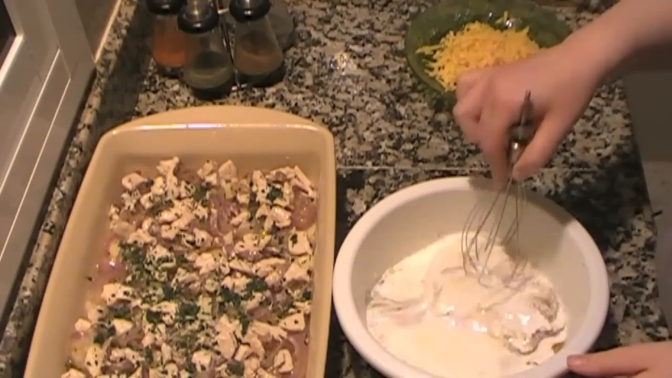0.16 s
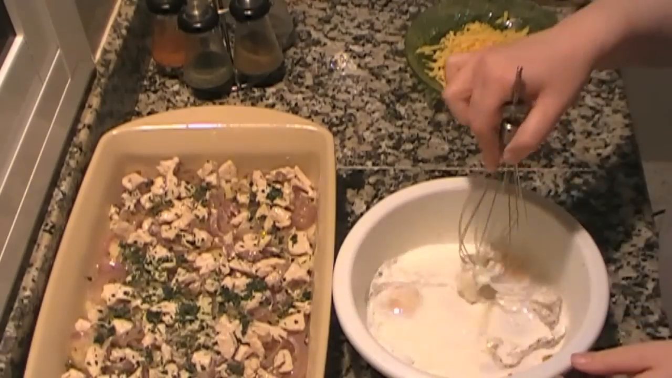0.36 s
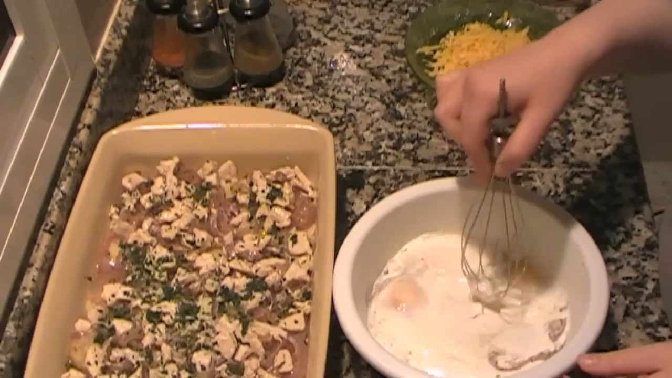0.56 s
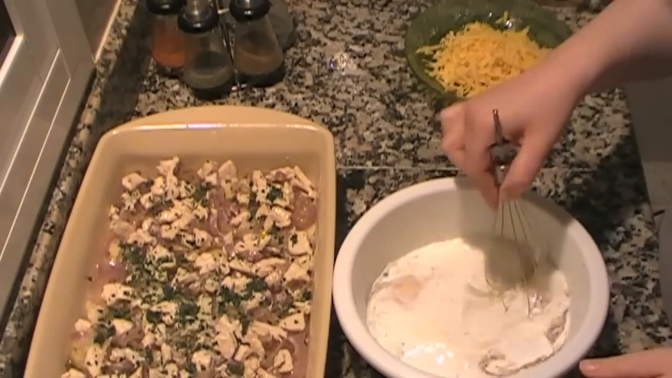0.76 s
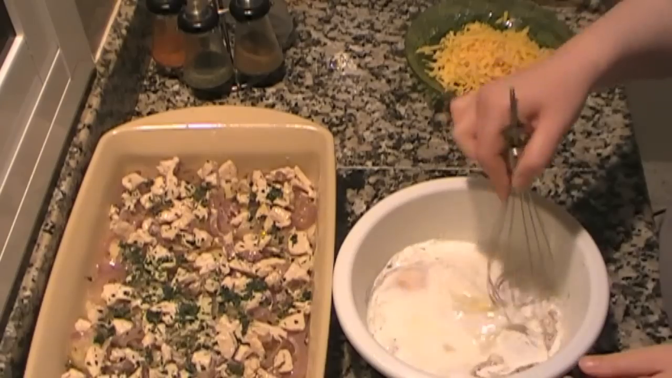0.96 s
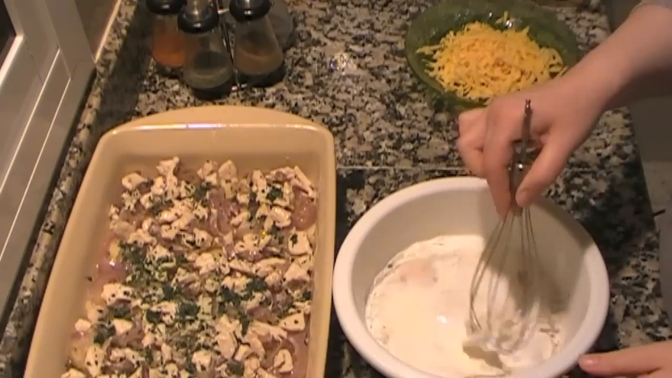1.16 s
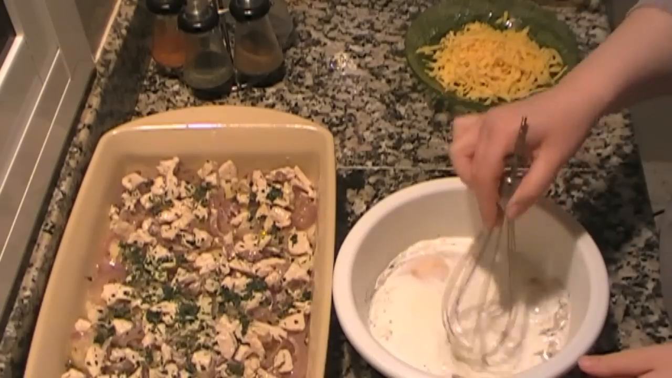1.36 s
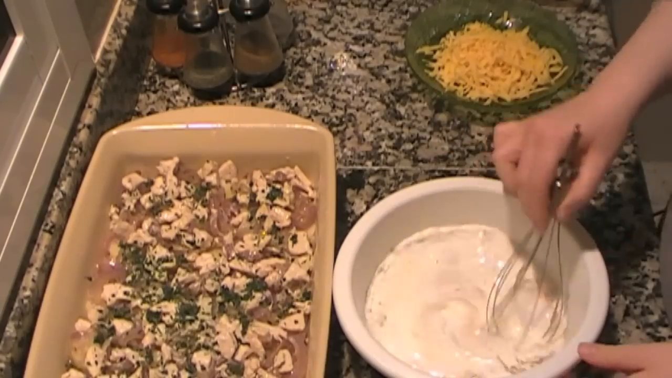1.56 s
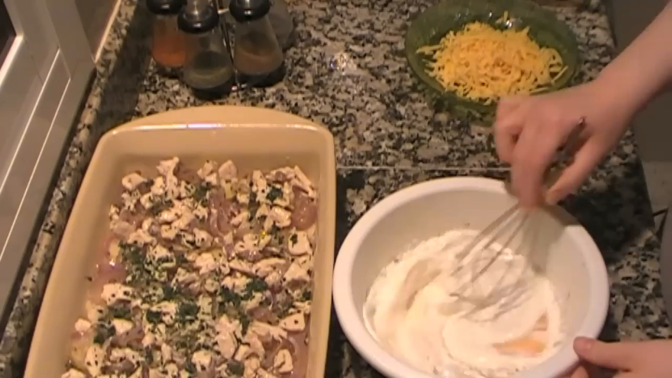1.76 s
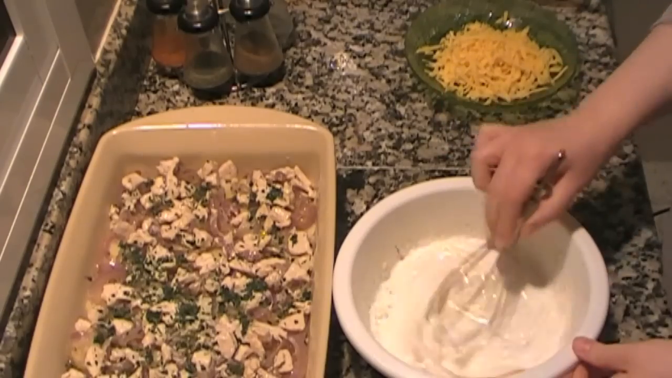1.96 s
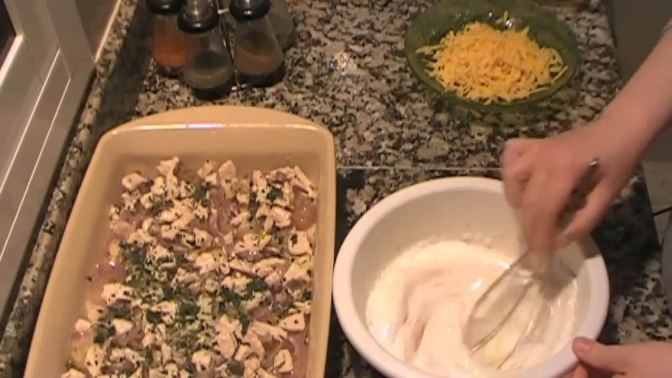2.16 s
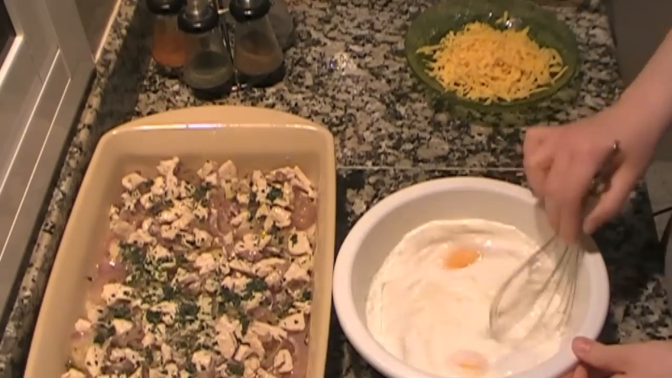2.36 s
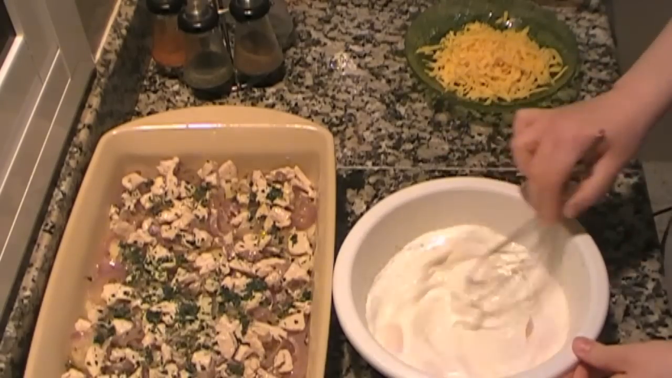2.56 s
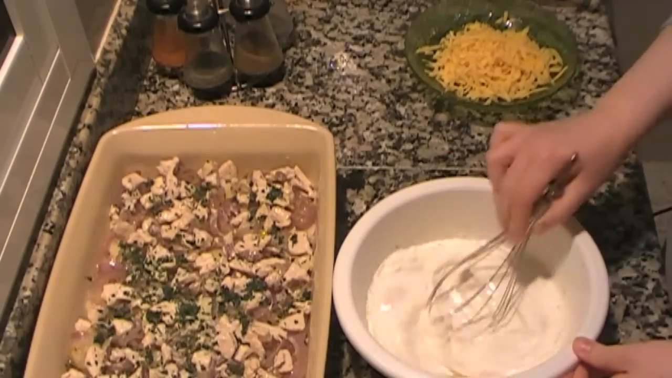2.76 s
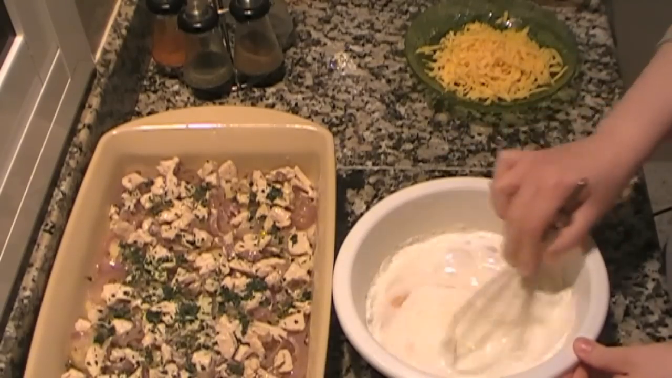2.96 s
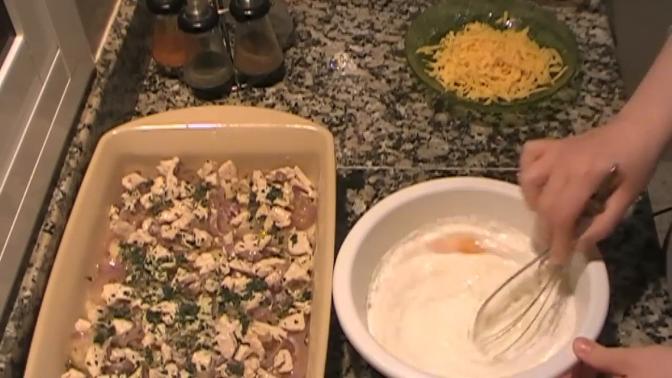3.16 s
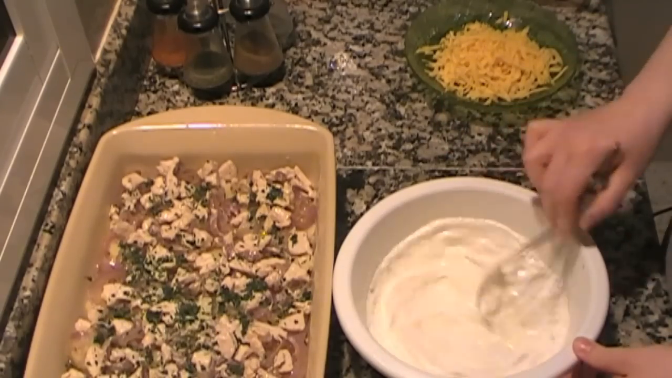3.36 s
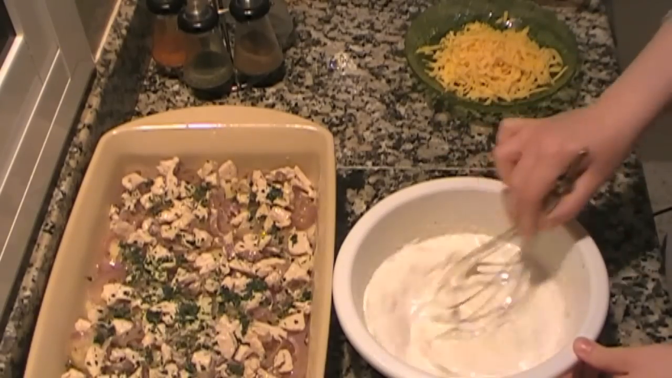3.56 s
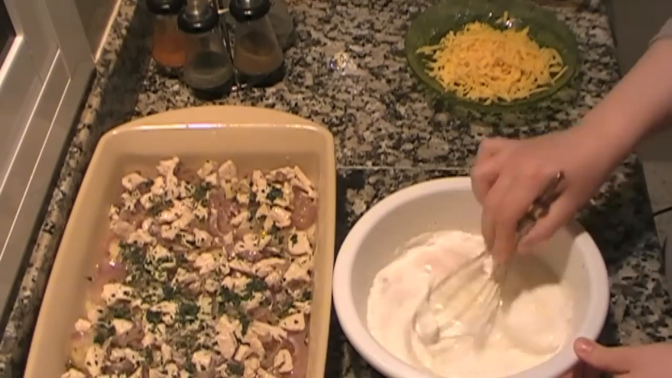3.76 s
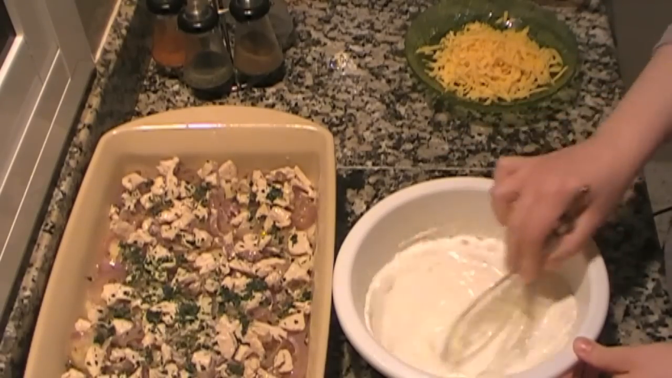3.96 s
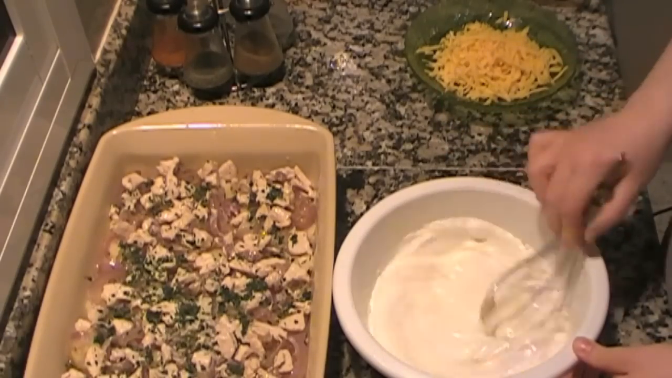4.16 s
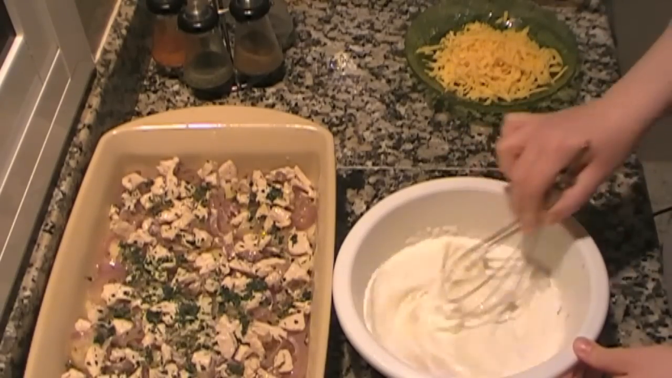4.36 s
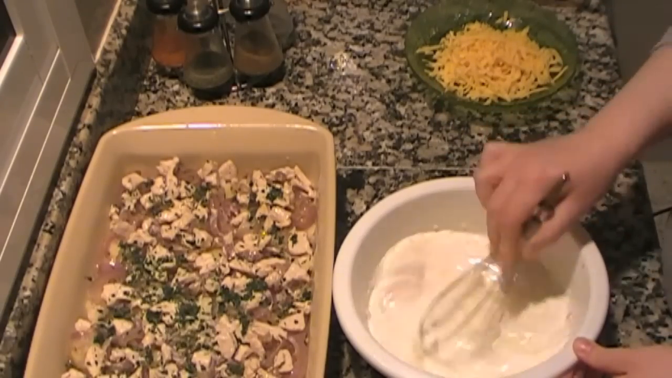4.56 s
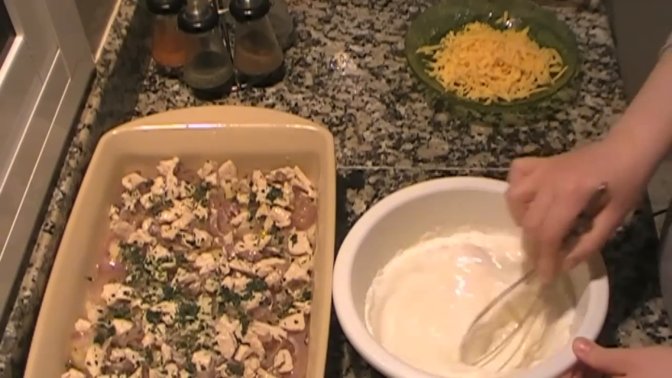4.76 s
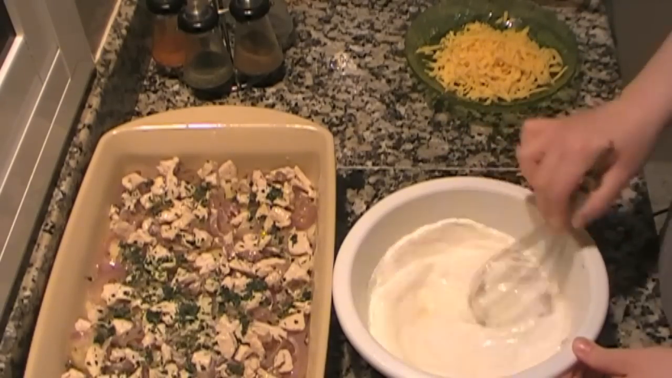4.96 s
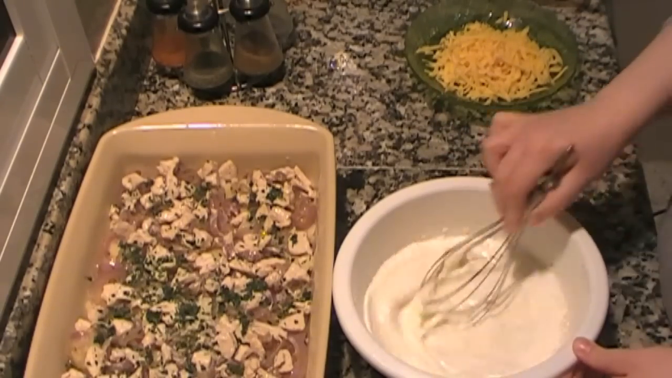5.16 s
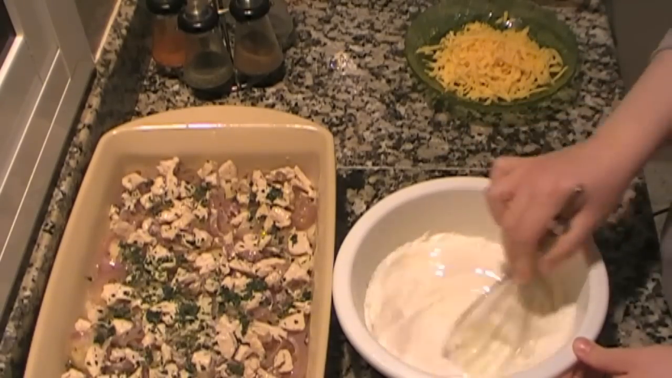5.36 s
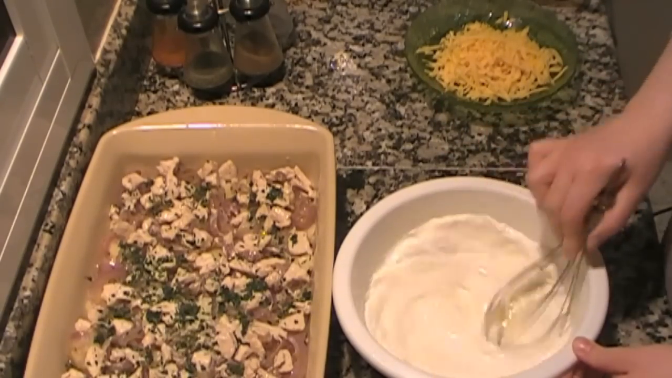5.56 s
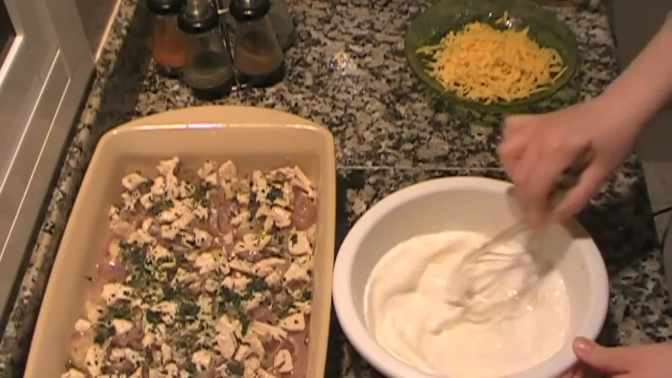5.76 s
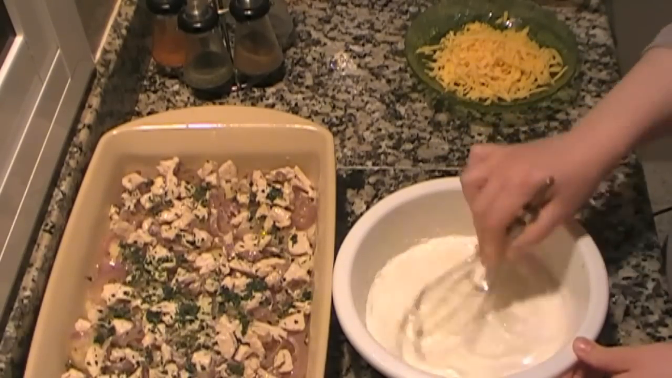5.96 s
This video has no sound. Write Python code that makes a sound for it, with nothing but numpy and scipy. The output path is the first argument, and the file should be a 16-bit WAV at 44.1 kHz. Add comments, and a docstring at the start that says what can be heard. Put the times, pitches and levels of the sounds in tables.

```python
"""Whisking eggs in a plastic bowl.

A wire whisk stabs six times at the bottom of a bowl of eggs and milk, then stirs fast circles.
Random touches ring bowl modes and wire pitches; decaying sines click; bubble blips make the slosh.
A dense decaying tail is the hard kitchen; shaped noise and a low hum, a sine near 99 Hz, lie under it.
Two microphone ports differ by frequency and cut the top treble."""
import sys
import numpy as np
from scipy import signal
from scipy.fft import rfft, irfft
from scipy.io import wavfile
from scipy.ndimage import uniform_filter1d

SR = 44100
rng = np.random.default_rng(int(sys.argv[2]) if len(sys.argv) > 2 else 0)


def to_wav(sig):
    """Store sig (one row per channel, or 1-D mono) as 16-bit WAV at the path in sys.argv[1].

    Samples outside -1..1 are clipped; the rate is SR.
    """
    pcm = np.clip(np.atleast_2d(sig), -1, 1) * 32767
    pcm = np.round(pcm).astype(np.int16)
    wavfile.write(sys.argv[1], SR, pcm.T)  # frames by channels


N = 265041
LEAD_IN = SR // 4  # samples computed before time zero

# Bowl modes. Each row: pitch [Hz], width before damping [Hz], relative drive [dB].
BOWL = [(278, 14, 4.5), (536, 30, -15), (565.5, 34, 3.5), (706, 21, -7), (760, 32, 6.5), (1176, 9.1, -5),
        (1310, 16, 3), (1371.5, 45, -2), (1432, 41, -7.5), (1816, 34, -13), (1983, 270, -4.5),
        (2134, 130, 0), (2518, 180, 0.5), (2726, 130, -8.5), (3310, 55, -2.5), (3790, 46, -4.5),
        (4500, 47, -9)]
# Whisk entry: first drag, a lift, then full contact. Each row: time [s], pressure level [dB].
ENTRY = [(1.51, -24), (1.57, -11.5), (1.63, -9.5), (1.68, -0.5), (1.72, -1.5), (1.75, -17), (1.79, -12.5),
         (1.85, -0.5)]
# Whisk circles. Each row: time of nearest sweep [s], scrape level [dB], wire fizz level [dB], before swells.
ROUNDS = [(1.69, -32, -35.5), (1.96, -34, -37), (2.24, -35, -39), (2.49, -36, -36), (2.75, -34, -36),
          (3.02, -35, -37), (3.31, -34, -37.5), (3.57, -34, -38), (3.8, -36, -36.5), (4.08, -34, -37),
          (4.36, -34.5, -35.5), (4.62, -36.5, -40), (4.87, -34, -36.5), (5.17, -33.5, -37),
          (5.44, -35.5, -36.5), (5.72, -36, -37), (5.98, -34, -37)]


def gain_of(db):
    """Decibels to a factor."""
    return 10 ** (np.asarray(db) / 20)


def evened(x):
    """Scaled to rms 1."""
    return x / np.sqrt(np.mean(x ** 2) + 1e-20)


def read(points, hz):
    """A spectrum table read on a log-frequency axis."""
    f, value = np.transpose(points)
    return np.interp(np.log(hz + 1), np.log(f + 1), value)


def add(mix, s, sound):
    """Mixes a sound in at a time; the mix starts LEAD_IN before zero."""
    part = mix[round(s * SR) + LEAD_IN:][:len(sound)]
    part += sound[:len(part)]


def coloured(x, points):
    """Passes x through a spectrum in dB."""
    hz = np.fft.rfftfreq(x.shape[-1], 1 / SR)
    return irfft(rfft(x) * gain_of(read(points, hz)), x.shape[-1])


def contacts(per_s, spread_db, size):
    """Sparse touches of random sign; a few are much stronger."""
    strength = gain_of(spread_db * np.minimum(rng.exponential(1, size), 4))
    return strength * rng.choice([-1, 1], size) * (rng.random(size) < per_s / SR)


def bump(t, s, length):
    """A soft rise and fall."""
    return np.exp(-((t - s) / length) ** 2)


def bowl(weight_db, damping=1):
    """The ring of the bowl after one touch: a sum of dying modes."""
    hz, width, db = np.transpose(BOWL)[:, :, None]
    t = np.arange(2048) / SR
    decay = np.exp(-np.pi * damping * width * t)
    return (gain_of(db + weight_db) * width * decay * np.sin(2 * np.pi * hz * t)).sum(0)


def knock(s, db, hz, second_hz, second_db, low_db):
    """Several wires land within milliseconds; the spot rings at two pitches of its own over the bowl's modes."""
    # Wires shivering after a knock. Each row: frequency [Hz], relative density [dB per Hz].
    splash_spectrum = [(2500, -2.5), (4000, 2.5), (7500, 4.5), (10000, -5.5), (12500, -11.5), (15500, -66)]
    # Wire loops ringing on. Each row: pitch [Hz], width [Hz].
    wire_modes = [(4050, 82), (4980, 210), (5220, 21), (6740, 43), (7200, 8.2)]
    stirred = s > ENTRY[-1][0]
    # stirred-up liquid shortens the ring, and only a few wires touch at once
    froth_damping = 1.7 if stirred else 1
    landing_s = 0.0016 if stirred else 0.0044
    chatter_base_db, chatter_follows = -22.5, 0.65  # dB, dB per dB of knock
    stays_down_s, stirred_chatter_db = 1.45, -4  # wires held in the liquid chatter less
    wire_share = 0.6

    t = np.arange(SR // 4) / SR
    short_t = t[:2048]
    touches = contacts(5000, 1.57, len(t))
    touches[50] = 4.2  # the first wire down

    modes_hz = np.array(BOWL)[:, :1]
    high = modes_hz > 900
    octaves_off = abs(np.log2(modes_hz / np.sqrt(hz * second_hz)))
    near = evened(bowl(np.where(high, -4.0 * octaves_off, -80), damping=4.8))
    spot_width_hz = np.array([[95], [150]]) * froth_damping
    spot_hz = np.array([[hz], [second_hz]])
    spot = np.exp(-np.pi * spot_width_hz * short_t) * np.sin(2 * np.pi * spot_hz * short_t)
    share = np.clip(gain_of(second_db), .05, .95)
    lower_share = np.sqrt(1 - share ** 2)
    ring = evened(lower_share * spot[0] + share * spot[1])

    # a light wire hardly stirs the bass at first
    thin = signal.butter(3, 1000, "high", fs=SR, output="sos")
    # the bulk of the wires arrives a moment after the first
    early_t = t[:900]
    arrival = np.exp(-(early_t / landing_s) ** 2) * np.clip(early_t / (0.28 * landing_s), 0, 1) ** 2
    arrivals = touches[:900] * arrival
    lower, upper, rest = (evened(np.convolve(arrivals, v)) for v in (*spot, near))
    first = signal.sosfilt(thin, lower_share * lower + share * upper + 0.077 * rest)

    splash = evened(coloured(touches, splash_spectrum))
    rattle = signal.oaconvolve(touches, near + 0.1 * ring)[:len(t)]
    rattle = evened(signal.sosfilt(thin, rattle))
    wire_hz, wire_width = np.transpose(wire_modes)[:, :, None]
    struck = gain_of(-30 * abs(np.log2(wire_hz / second_hz)))  # loops near the higher pitch ring most
    loops = struck * np.exp(-np.pi * wire_width * short_t) * np.sin(2 * np.pi * wire_hz * short_t)
    wires = struck.max() * evened(signal.oaconvolve(touches, loops.sum(0))[:len(t)])

    # relative to the knock, whose own level is applied at the end
    chatter_db = chatter_base_db + (chatter_follows - 1) * db + stirred_chatter_db * (s > stays_down_s)
    chatter = rattle + 0.67 * splash + wire_share * wires
    chatter *= gain_of(chatter_db - 60 * t / 0.36) * (1 - np.exp(-t / 0.0016))
    chatter[:len(first)] += first / abs(first).max()
    chatter[:900] += 1.6 * gain_of(chatter_db) * splash[:900] * arrival / arrival.max()

    # the low modes follow as the liquid is pushed aside
    shove = touches * (1 - np.exp(-t / 0.002)) * gain_of(-60 * t / 0.22)
    low = signal.oaconvolve(shove, bowl(np.where(high, -80, 0), damping=2.17))[:len(t)]
    return s, gain_of(db) * (chatter + gain_of(low_db) * low / abs(low).max())


def counter(x):
    """Echoes off things nearby reach the two ports in opposite polarity, mostly in the treble."""
    # Each row: frequency [Hz], echo level [dB].
    echo_spectrum = [(200, -27), (4800, -50), (6500, -17), (8500, -0.5), (13000, -13)]
    echoes = rng.standard_normal(1500) * gain_of(-60 * np.arange(1500) / SR / 0.017)
    side = signal.oaconvolve(x, echoes / np.linalg.norm(echoes))[:len(x)]
    side = coloured(side, echo_spectrum)
    return np.array([side, -side])


def diffuse(frames):
    """Random short-time spectra for two ports that are partly alike."""
    # Each row: frequency [Hz], left-right likeness [0 to 1].
    likeness = [(40, 0.26), (150, 0.92), (400, 0.97), (1500, 0.82), (5000, 0.8), (8000, 0.42),
                (15000, 0.19)]
    a, b, c, d = rng.standard_normal((frames, 257, 4)).T
    hz = np.fft.rfftfreq(512, 1 / SR)
    same = read(likeness, hz)[:, None]
    left, other = a + 1j * b, c + 1j * d
    return hz, np.array([left, same * left + np.sqrt(1 - same ** 2) * other])


def kitchen(x):
    """Hard walls and counters: a dense tail in which each band dies at its own speed."""
    # Each row: frequency [Hz], time to fall 60 dB [s].
    t60_s = [(200, 0.31), (600, 0.5), (1500, 0.58), (4000, 0.41), (9000, 0.36), (14000, 0.17)]
    # Room against direct sound. Each row: frequency [Hz], level [dB].
    echo_spectrum = [(200, -2.5), (1000, -8.5), (3000, -8.5), (7000, -8), (12000, -4.5)]
    hz, z = diffuse(300)
    t = np.arange(300) * 128 / SR
    decay = gain_of(-60 * t / read(t60_s, hz)[:, None])
    tail = signal.istft(z * decay, nperseg=512, noverlap=384)[1]
    tail *= np.clip((np.arange(tail.shape[1]) / SR - .003) / 0.00065, 0, 1)  # silent for the first 3 ms
    tail = coloured(tail / np.linalg.norm(tail[0]), echo_spectrum)
    return signal.oaconvolve(x[None], tail, axes=1)[:, :len(x)]


def background():
    """Steady room noise from shaped random spectra, and a low hum: a sine near 99 Hz."""
    # Each row: frequency [Hz], relative density [dB per Hz].
    air_spectrum = [(15, -59), (25, -29), (75, -16), (126, -24), (267, -2.5), (848, 4), (1570, -10),
                    (7700, -7.5), (10400, -18.5), (13500, -40), (15500, -57)]
    # Pitch [Hz], middle level [dB].
    hum_tone = (99.3, -74.5)
    air_db, waver_db = -50, 3.6  # the hum's level rises and dips irregularly
    hz, z = diffuse(N // 128 + 5)
    shaped = z * gain_of(read(air_spectrum, hz))[:, None]
    air = evened(signal.istft(shaped, nperseg=512, noverlap=384)[1][:, :N])
    waver = evened(uniform_filter1d(uniform_filter1d(rng.standard_normal(N), 5000), 5000))
    hum_hz, hum_db = hum_tone
    hum = np.sqrt(2) * np.sin(2 * np.pi * hum_hz * np.arange(N) / SR)
    return gain_of(air_db) * air + gain_of(hum_db + waver_db * waver) * hum


def click(s, db, hz):
    """A thin snap of a few cycles, answered by the walls of the bowl about a millisecond later."""
    t = np.arange(600) / SR - .0014
    pitches = hz * np.array([[1], [.78], [1.3], [1.95]]) * rng.uniform(0.96, 1.04, (4, 1))
    decay = np.exp(-(t / 0.00023) ** 2 * (t < 0) - t * (t > 0) / 0.00036)
    snap = (gain_of([[0], [-8], [-9], [-9]]) * decay * np.sin(2 * np.pi * pitches * t)).sum(0)
    # three delayed, weaker copies of the snap
    lags = (np.array([.0006, .0013, .0024]) * rng.uniform(0.78, 0.89, 3) * SR).astype(int)
    echoes = 0.19 * np.roll(snap, lags[0]) + 0.53 * np.roll(snap, lags[1]) + 0.2 * np.roll(snap, lags[2])
    snap = snap + echoes
    return s, gain_of(db) * snap / abs(snap).max()


def slow(count, size):
    """Independent wanderings of rms 1 that turn every few hundredths of a second."""
    return evened(uniform_filter1d(uniform_filter1d(rng.standard_normal((count, size)), 600), 400))


def dragged(size, surge_db, flutter_db, damping, low_hz, high_hz):
    """Dense touches ring one group of modes; as the wires travel each mode flares and fades on its own."""
    touches, out = contacts(5000, 2.36, size) * gain_of(surge_db), np.zeros(size)
    group = [mode for mode in BOWL if low_hz < mode[0] < high_hz]
    for (hz, width, db), flare in zip(group, slow(len(group), size)):
        r = np.exp(-np.pi * damping * width / SR)
        turn = 2 * np.pi * hz / SR
        drive = touches * gain_of(db + flutter_db * flare) * width * np.sin(turn)
        out += signal.lfilter([1], [1, -2 * r * np.cos(turn), r ** 2], drive)
    return evened(out)


def bubbles(size, per_s, low_hz, high_hz, cycles):
    """Short rising blips of many sizes, as air is folded into the liquid."""
    out = np.zeros(size)
    for hz in np.geomspace(low_hz, high_hz, 16):
        turns = np.arange(int(3 * cycles * SR / hz)) * hz / SR
        rise = np.sin(2 * np.pi * turns * (1 + 0.0026 * turns))
        blip = np.exp(-turns / cycles) * (1 - np.exp(-turns)) * rise
        out += signal.oaconvolve(contacts(per_s / 16, 1.85, size), blip / np.linalg.norm(blip))[:size]
    return evened(out)


def turns_at(t):
    """Circles of the whisk completed at each moment."""
    return np.interp(t, np.transpose(ROUNDS)[0], np.arange(len(ROUNDS)))


def swell_db(t, once_db, once_lag, twice_db, twice_lag, follows):
    """Level change of a layer as the whisk goes round, and as it first comes down."""
    turns = turns_at(t)
    once = once_db * np.cos(2 * np.pi * (turns - once_lag))
    twice = twice_db * np.cos(4 * np.pi * (turns - twice_lag))
    return once + twice + follows * np.interp(t, *np.transpose(ENTRY))


def furrow(t, surge_db):
    """Air in the furrow behind the wires: touches through one resonance that glides up and back once a circle."""
    # Middle pitch [Hz], swing [Hz], lag [turns], width [Hz], level before swells [dB].
    resonance = (2752, 230, 0.2, 137, -44.5)
    # Once a turn [dB], lag [turns], twice a turn [dB], lag [turns], follows entry [dB per dB].
    swell = (3.7, 0.44, 0.56, 0.19, 1.5)
    mid_hz, swing_hz, lag, width, db = resonance
    hz = mid_hz - swing_hz * np.cos(2 * np.pi * (turns_at(t) - lag))
    turn, r = np.exp(2j * np.pi * np.cumsum(hz) / SR), np.exp(-np.pi * width / SR)
    # a one-pole filter in a frame that turns with the pitch
    rung = (turn * signal.lfilter([1], [1, -r], contacts(5000, 2.7, len(t)) / turn)).real
    return gain_of(db + surge_db + swell_db(t, *swell)) * evened(rung)


def stirring():
    """Wire loops drag over the bowl in uneven surges, fizz in the treble and push the liquid round."""
    # Spectra. Each row: frequency [Hz], relative density [dB per Hz].
    fizz_spectrum = [(1650, -16.5), (2800, -2), (4360, -8), (6710, -5.5), (8200, -11), (11700, -31.5),
                     (14000, -77)]
    slosh_spectrum = [(71, -57), (264, -19), (564, 34), (655, -4), (1100, -16), (1430, -34), (2420, -120)]
    # Swells: once a turn [dB], lag [turns], twice a turn [dB], lag [turns], follows entry [dB per dB].
    ring_swell = (0.31, 0.96, 0.13, 0.079, 0.96)
    scrape_swell = (1.4, -0.38, 1.74, -0.086, 1.1)
    fizz_swell = (0.92, 0.0033, 1.47, 0.0044, 1.17)
    liquid_swell = (4.5, -0.3, 3.4, 0.42, 0.5)
    ring_db, liquid_db, flutter_db = -35.5, -50, 1.5
    low_hz, mid_hz, top_hz = 1100, 1600, 9000  # edges of the mode groups

    size = N + LEAD_IN
    s, *columns = np.transpose(ROUNDS)
    t = (np.arange(size) - LEAD_IN) / SR
    scrape_db, fizz_db = (np.interp(t, s, c) for c in columns)
    surges_db = slow(count=4, size=size) * [[1.3], [2.2], [1.8], [1.5]]
    ring_surge, scrape_surge, fizz_surge, body_surge = surges_db

    body = dragged(size, body_surge, flutter_db, 0.61, 0, low_hz)
    ring = dragged(size, ring_surge, 2.2, 1.4, low_hz, mid_hz)
    # as froth builds up it damps the upper modes
    froth = np.clip((t - 1.7) / 0.5, 0, 1)
    clear = dragged(size, scrape_surge, 3.2, 0.64, mid_hz, top_hz)
    damped = dragged(size, scrape_surge, flutter_db, 1.5, mid_hz, top_hz)
    scrape = np.sqrt(1 - froth) * clear + np.sqrt(froth) * damped
    scrape = evened(scrape + 0.44 * froth * bubbles(size, 120, 1793, 4520, 9.1))

    fizz = contacts(9000, 2.9, size) * gain_of(0.47 * scrape_surge + fizz_surge)
    fizz = evened(fizz) + 0.29 * bubbles(size, 430, 3037, 9170, 30.0)
    fizz = evened(coloured(fizz, fizz_spectrum))
    slosh = evened(coloured(bubbles(size, 260, 241.0, 1200, 7.6), slosh_spectrum))

    liquid = gain_of(liquid_db + swell_db(t, *liquid_swell)) * (body + 0.55 * slosh)
    ring = gain_of(ring_db + swell_db(t, *ring_swell)) * ring
    scrape = gain_of(scrape_db + swell_db(t, *scrape_swell)) * scrape
    fizz = gain_of(fizz_db + swell_db(t, *fizz_swell)) * fizz
    start = np.clip((t - ENTRY[0][0] + 0.01) / 0.01, 0, 1)
    return start * (ring + scrape + froth * furrow(t, scrape_surge) + fizz + liquid)


def catch(s, db, hz):
    """A wire catches the wall: a short burst of touches rings the spot under it at one pitch."""
    width_hz, catch_s, clear_catch_s = 137, 0.011, 0.026  # before there is froth a catch drags on longer
    t = np.arange(8192) / SR
    short_t = t[:2048]
    spot = short_t * np.exp(-np.pi * width_hz * short_t) * np.sin(2 * np.pi * hz * short_t)
    rung = signal.oaconvolve(contacts(5000, 1.5, len(t)), spot)[:len(t)]
    rung *= bump(t, t[-1] / 2, clear_catch_s if s < ENTRY[3][0] - catch_s else catch_s)
    return s - t[-1] / 2, gain_of(db) * rung / np.sqrt(2 * uniform_filter1d(rung ** 2, 600).max())


def slop(s, db, hz, length):
    """The liquid slops over itself: a gulp of bubbles gathered round one pitch."""
    spread_octaves = 0.66
    t = np.arange(SR // 3) / SR
    f = np.fft.rfftfreq(len(t), 1 / SR)
    gulp = bubbles(len(t), 1800, 0.645 * hz, 1.494 * hz, 5.4)
    gulp = irfft(rfft(gulp) * bump(np.log2(f + 1), np.log2(hz), spread_octaves), len(t))
    return s - t[-1] / 2, gain_of(db) * evened(gulp) * bump(t, t[-1] / 2, length)


def thump(s, db):
    """The bowl jolts the counter: one low push, a fast-dying sine."""
    t = np.arange(3000) / SR
    return s, gain_of(db) * np.sin(2 * np.pi * 100 * t) * np.exp(-t / 0.0027)


def scene():
    """Whisk, bowl and liquid, their echoes and the background."""
    # Wires knocking the bowl. Each row: time [s], level [dB], ring pitch [Hz], higher ring pitch [Hz],
    # share of the higher ring [dB], low modes [dB].
    knocks = [(-.12, -1.5, 2450, 5900, 0.5, -22), (0.1608, -17.5, 1390, 3300, 0, -26),
              (0.1616, -13.5, 2540, 4500, -9.5, -28), (0.192, -18, 2450, 3300, -1, -13.5),
              (0.2008, -29.5, 2130, 2670, -12, -4), (0.452, -19, 2050, 4200, -3.5, -22),
              (0.4658, -12.5, 1450, 2180, -3, -13.5), (0.7343, -14.5, 1840, 3950, -6.5, -19),
              (0.7455, -18, 2320, 2310, 8, -5), (0.753, -18, 2380, 3300, -3, -27),
              (0.7593, -20, 1410, 2500, -17, -22), (1.0203, -21.5, 3320, 5300, -5, -7.5),
              (1.023, -16, 1670, 4110, -6, -10), (1.026, -17.5, 1316, 2480, -4.5, -13),
              (1.2253, -41, 1500, 2400, -11, -17), (1.2355, -14.5, 2520, 3150, -1, -48),
              (1.2391, -17.5, 1410, 4180, -4.5, -39), (1.244, -23, 2370, 2400, -8, -42),
              (1.2697, -23.5, 1850, 3200, -21, -4.5), (1.279, -23, 1800, 2480, -5, -11),
              (1.297, -23, 1810, 2520, -3, -9), (1.4992, -22, 1200, 1860, -6.5, -39),
              (1.5004, -20, 2660, 3340, -2, -9.5), (1.918, -18, 1960, 4140, 0, -23),
              (2.2428, -13.5, 2030, 2520, -10, -20), (2.516, -14, 1400, 2470, -1, -18.5),
              (4.35, -15.5, 2270, 3970, -1.5, -39), (5.1462, -10.5, 1270, 2920, -28.5, -18),
              (5.174, -20, 2660, 4230, -15, -15.5), (5.4449, -12.5, 1520, 4470, -2.5, -33),
              (5.4456, -12, 2300, 3000, -0.5, -37), (5.7112, -14, 1320, 2080, -27, -13)]
    # Wire snapping against wire. Each row: time [s], level [dB], pitch [Hz].
    clicks = [(0.1636, -12.5, 6640), (0.19, -21, 5860), (0.2386, -20, 6900), (0.464, -25, 6850),
              (0.7465, -7.5, 7540), (0.753, -14, 5930), (0.758, -12.5, 7260), (1.1708, -31, 8040),
              (1.784, -21.5, 4500), (1.918, -7, 7350), (2.515, -14.5, 8100), (3.284, -14, 3800),
              (3.3047, -6.5, 7100), (3.311, -10.5, 4720), (3.3324, -6, 6440), (3.7916, -12.5, 3640),
              (3.989, -23, 8360), (4.069, -9.5, 6440), (4.2015, -14.5, 8400), (4.3495, -3, 7140),
              (4.6192, -5, 7070), (5.015, -18.5, 6300), (5.172, -7.5, 7100), (5.428, -17, 7640),
              (5.444, -2.5, 7130), (5.73, -17, 6800), (5.989, -16.5, 6800)]
    # Wires catching the wall. Each row: time [s], level [dB], pitch [Hz].
    catches = [(1.53, -39, 1200), (1.534, -32, 1934), (1.545, -36, 2540), (1.6, -31.5, 1270),
               (1.6, -34, 1950), (1.64, -29, 1310), (1.645, -34.5, 2540), (1.645, -39, 3420),
               (1.715, -31.5, 2010), (1.76, -39, 2030), (1.681, -28.5, 1280), (1.717, -34, 1230),
               (1.815, -32.5, 1320), (1.853, -23, 1330), (2.061, -25, 1376), (2.071, -35, 2480),
               (2.149, -27.5, 1336), (2.181, -28, 1264), (2.284, -24.5, 1337), (2.37, -32.5, 1280),
               (2.446, -31, 1324), (2.54, -24.5, 1360), (2.62, -28, 1240), (2.712, -37, 1360),
               (2.812, -22.5, 1330), (2.856, -31.5, 2570), (2.89, -27.5, 2700), (2.9, -26.5, 1315),
               (3.005, -29, 1330), (3.01, -28.5, 2640), (3.071, -26, 1334), (3.451, -28, 1255),
               (3.495, -35, 1200), (3.86, -34.5, 3780), (3.96, -25, 1355), (4.085, -39, 3740),
               (4.239, -21.5, 1343), (4.27, -30, 1270), (4.45, -29, 1340), (4.49, -37, 3880),
               (4.613, -25.5, 2590), (4.83, -28, 1360), (5.261, -31.5, 2550), (5.545, -26.5, 1397),
               (5.675, -23, 1320), (5.714, -25, 1303), (5.76, -28, 1310), (5.889, -25.5, 1350)]
    # Liquid slopping over. Each row: time [s], level [dB], centre pitch [Hz], length [s].
    slops = [(2.199, -36.5, 627, 0.033), (2.914, -33.5, 647, 0.0069), (3.231, -41, 600, 0.037),
             (5.294, -38, 696, 0.047), (5.496, -38, 773, 0.014), (5.688, -39.5, 504, 0.066),
             (5.765, -31.5, 1053, 0.044)]
    # Jolts of the counter. Each row: time [s], level before decay [dB].
    thumps = [(5.442, -38)]
    # Microphone response. Each row: frequency [Hz], gain [dB].
    mic_response = [(25, -52), (60, -29), (125, -21.5), (250, -6.5), (500, -2.5), (11000, 3),
                    (13000, -10.5), (15500, -29)]

    whisk, snaps, jolts = stirring(), np.zeros(N + LEAD_IN), np.zeros(N + LEAD_IN)
    for row in knocks:
        add(whisk, *knock(*row))
    for row in catches:
        add(whisk, *catch(*row))
    for row in slops:
        add(whisk, *slop(*row))
    for row in clicks:
        add(snaps, *click(*row))
    for row in thumps:
        add(jolts, *thump(*row))
    # snaps beam up out of the bowl, so less of them reaches the walls
    heard = whisk + snaps + counter(whisk + snaps) + kitchen(whisk + .5 * snaps)
    return (coloured(heard, mic_response) + jolts)[:, LEAD_IN:] + background()


def record(dry):
    """The two ports differ in level and phase by frequency; then the band limit."""
    # Each row: frequency [Hz], left over right [dB].
    lean = [(40, -1), (100, 3), (600, 2.5), (1200, 1), (2300, -0.7), (4500, 0.5), (8000, 1), (13000, -5)]
    # Each row: frequency [Hz], phase by which left leads [radians].
    lead = [(100, 0.64), (1200, 0.28), (5500, 0.4), (7200, 0.16), (8600, -0.62), (9800, 1), (12000, 1)]
    edge_hz = 15760
    hz = np.fft.rfftfreq(N, 1 / SR)
    half = gain_of(read(lean, hz) / 2) * np.exp(.5j * read(lead, hz))
    ports = irfft(rfft(dry) * np.array([half, 1 / half]), N)
    low_pass = signal.firwin(511, edge_hz, window=("kaiser", 9), fs=SR)
    return signal.oaconvolve(ports, low_pass[None], "same")


dry = scene()
out = record(dry)
to_wav(out)
```